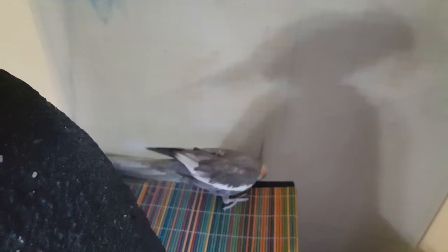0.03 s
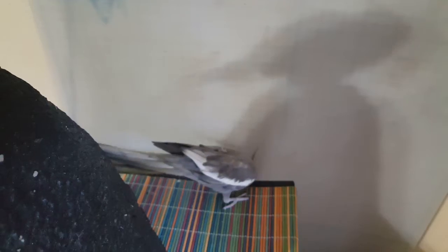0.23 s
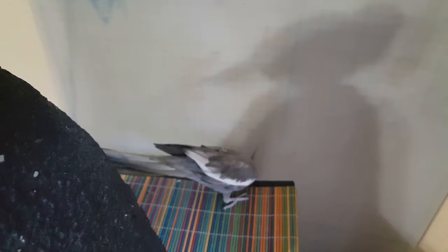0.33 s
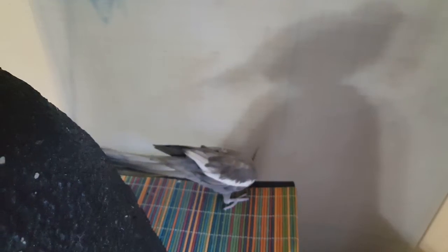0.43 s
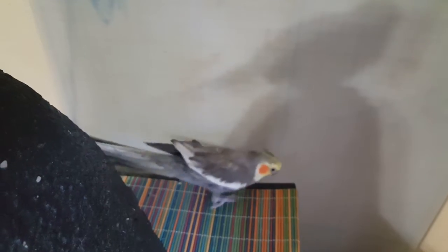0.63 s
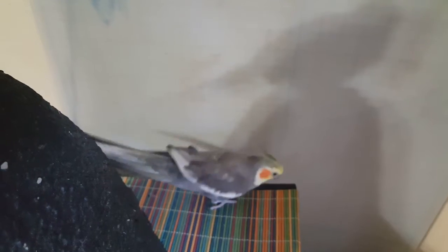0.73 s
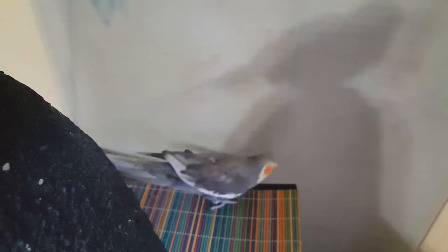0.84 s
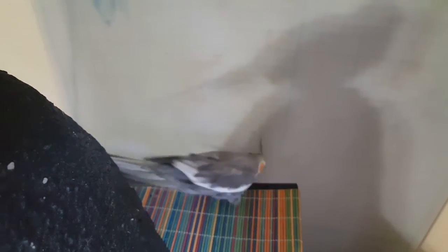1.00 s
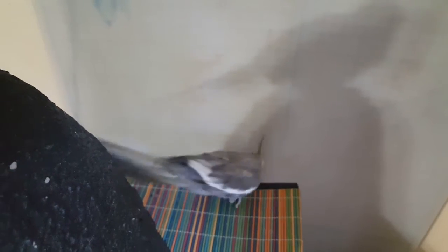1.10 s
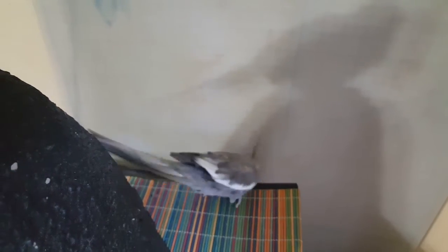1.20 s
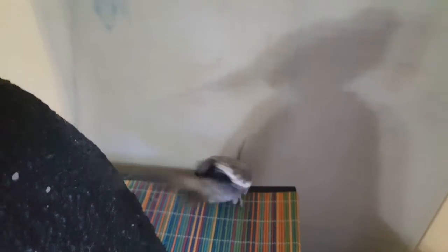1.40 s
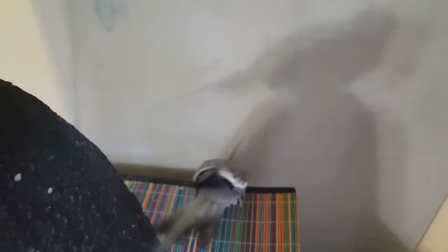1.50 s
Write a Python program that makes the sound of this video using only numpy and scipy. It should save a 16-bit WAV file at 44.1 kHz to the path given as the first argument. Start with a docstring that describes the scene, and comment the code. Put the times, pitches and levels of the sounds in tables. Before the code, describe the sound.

One brief rising and falling cockatiel chirp indoors, followed by faint footsteps.

```python
"""Cockatiel chirp and footsteps

A cockatiel gives one chirp in a small room, near the left microphone: the pitch arches up and down,
with a fast warble on the way up that breaks into a rasp as the syrinx falters, then a clean falling
whistle. Its feet tap on a woven mat and ring the board beneath, and its feathers rustle.
Under it all lie a low room rumble and a few soft bumps of the hand-held microphone."""
import sys
import numpy as np
from scipy import signal
from scipy.fft import rfft, irfft, next_fast_len
from scipy.io import wavfile
from scipy.ndimage import map_coordinates

SR = 44100
rng = np.random.default_rng(int(sys.argv[2]) if len(sys.argv) > 2 else 0)


def store_pcm(level_fs):
    """Save levels as 16-bit WAV."""
    pcm = np.round(np.clip(level_fs, -1, 1) * 32767).astype(np.int16)
    wavfile.write(sys.argv[1], SR, np.atleast_2d(pcm).T)


N = 68355
TIME = np.arange(N) / SR


def amp(db):
    """Decibels to gain."""
    return 10 ** (np.asarray(db) / 20)


def unit(x):
    """Scale to rms 1."""
    return x / np.sqrt(np.mean(x ** 2) + 1e-20)


def along(points, hz):
    """Read (frequency, value) points at hz, on a log frequency axis."""
    f, v = np.transpose(points)
    return np.interp(np.log(hz + 1), np.log(f + 1), v)


def curves(rows):
    """One automation curve for each column after the time."""
    times, *columns = np.transpose(rows)
    return [np.interp(TIME, times, column) for column in columns]


def swells(rows):
    """A rounded rise and fall for each (start, length, level) row."""
    return sum(amp(db) * np.sqrt(np.abs(np.sin(np.pi * np.clip((TIME - start) / length, 0, 1))))
               for start, length, db in rows)


def wobble(rate):
    """A smooth random curve, rate knots a second."""
    return map_coordinates(rng.standard_normal(N), [TIME * rate], mode="wrap")


def filtered(x, response):
    """Filter x by a complex response of frequency."""
    size = next_fast_len(N + SR // 2)
    return irfft(rfft(x, size) * response(np.fft.rfftfreq(size, 1 / SR)), size)[..., :N]


def eq(x, colour):
    """Shape x with a (frequency, gain) curve."""
    return filtered(x, lambda hz: amp(along(colour, hz)))


def delayed(x, ms):
    """The same sound over a longer path."""
    return filtered(x, lambda hz: np.exp(-2j * np.pi * hz * ms / 1000))


def noise(colour):
    """Coloured noise of rms 1."""
    return unit(eq(rng.standard_normal(N), colour))


# How alike the two microphones hear diffuse sound (frequency [Hz], correlation [0-1])
STEREO_LIKENESS = [(30, 1), (120, 0.89), (400, 0.69), (1200, 0.1), (4000, 0.056)]
def stereo_noise(colour):
    """Coloured noise, centred in the bass and wide in the treble."""
    def width(hz):
        return np.arccos(np.clip(along(STEREO_LIKENESS, hz), -1, 1)) / 2
    mid = filtered(noise(colour), lambda hz: np.cos(width(hz)))
    side = filtered(noise(colour), lambda hz: np.sin(width(hz)))
    return unit(np.array([mid + side, mid - side]))


# Bass-heavy room tone (frequency [Hz], gain [dB])
RUMBLE_COLOUR = [(15, -53.5), (28, -21), (45, 1), (70, 0), (125, 0), (180, -3), (350, -2.5), (520, -6),
                 (850, -13), (1900, -17.5), (2700, -20), (5500, -32), (16000, -34)]
# Its slow drift (time [s], level [dB])
RUMBLE_LEVEL = [(0, -59.5), (.22, -60), (.55, -60), (.75, -60.5), (1, -60), (1.25, -58.5), (1.55, -59)]
def room_rumble():
    """A low, nearly steady bed of room noise."""
    level_db, = curves(RUMBLE_LEVEL)
    return amp(level_db) * stereo_noise(RUMBLE_COLOUR)


# Handling bumps (start [s], length [s], level [dB])
MIC_BUMPS = [(.25, 0.084, -66), (.41, 0.23, -63.5), (.655, 0.041, -63.5)]
# Their sub-bass weight (frequency [Hz], gain [dB])
MIC_BUMP_COLOUR = [(24, -32), (40, -10.5), (50, -8), (68, -23), (110, -27), (400, -64)]
def microphone_bumps():
    """Soft low bumps of the hand-held microphone."""
    return swells(MIC_BUMPS) * noise(MIC_BUMP_COLOUR)


# Decay of the small room (frequency [Hz], t60 [s])
REVERB_DECAY = [(300, 0.12), (2000, 0.26), (5000, 0.19), (12000, 0.18)]
# Tone of the reflections (frequency [Hz], gain [dB])
REVERB_COLOUR = [(300, 14.5), (2200, -5), (5000, 2), (12000, -8)]
def room_reverb(x, predelay_s=0.0037):
    """The walls answer with a short diffuse tail, one for each microphone."""
    hz, age, spectrum = signal.stft(rng.standard_normal((2, SR // 2)), SR, nperseg=256)
    decay = amp(-60 * age / along(REVERB_DECAY, hz)[:, None])
    _, tail = signal.istft(spectrum * decay, SR, nperseg=256)
    send = np.pad(x, (int(predelay_s * SR), 0))
    wet = signal.fftconvolve(send[None], tail / np.linalg.norm(tail[0]), axes=1)[:, :N]
    return eq(wet, REVERB_COLOUR)


# Feather swishes (start [s], length [s], level [dB])
FEATHER_RUSTLES = [(.06, 0.179, -65.5), (.19, 0.04, -70), (.81, 0.016, -64), (1.092, 0.11, -67),
                   (1.198, 0.019, -57.5), (1.24, 0.036, -61.5), (1.293, 0.032, -62.5), (1.52, 0.037, -69)]
# Their broad, airy tone (frequency [Hz], gain [dB])
FEATHER_COLOUR = [(1000, 2), (3500, 1.5), (5200, 6), (7000, 0), (10000, 4), (15000, -2.5)]
def feathers(grain_db=3, pan_db=0.8):
    """Short grainy swishes as the bird turns, a touch to the left."""
    texture = unit(amp(grain_db * wobble(490)) * stereo_noise(FEATHER_COLOUR))
    return swells(FEATHER_RUSTLES) * texture * amp([[pan_db], [-pan_db]])


# Modes of the board under the mat (frequency [Hz], gain [dB], t60 [s])
BOARD_MODES = [(780, -10, .05), (980, 0, .07), (1110, -2, .06), (1400, -11, .04), (2080, -7, .05)]
def board_ring(age, scatter_db=1.5, detune=0.022):
    """The board's damped modes, a little different under every step."""
    ring = np.zeros(N)
    for hz, db, t60 in BOARD_MODES:
        envelope = amp(db + rng.normal(0, scatter_db) - 60 * age / t60)
        ring += envelope * np.sin(2 * np.pi * hz * rng.normal(1, detune) * age)
    return ring


# Foot taps (time [s], relative level [dB], scuff tilt [dB/octave], scuff t60 [s])
STEPS = [(.687, -53, 4, 0.03), (.738, -40, 1, 0.033), (.806, -49.5, 8.5, 0.034), (.826, -50, 7, 0.062),
         (.851, -52, 5, 0.039), (.892, -51, -10, 0.036), (1.036, -43.5, 8, 0.024), (1.11, -47.5, -5, 0.085),
         (1.207, -45, -2, 0.054), (1.246, -31.5, -3, 0.047), (1.257, -38.5, -18, 0.063),
         (1.269, -46, 2.5, 0.072), (1.364, -53, 0, 0.047), (1.386, -50, 7, 0.034), (1.425, -44, -9, .05),
         (1.519, -46.5, 7.5, 0.032)]
# A foot scuffing the woven mat (frequency [Hz], gain [dB])
SCUFF_COLOUR = [(200, -32), (400, -21), (620, -13), (800, -6), (1000, 0), (1400, -7), (2200, -13),
                (3100, -23), (4400, -25), (6500, -40), (15000, -46)]
def footsteps(scuff_db=-2.5, ring_db=-10, attack_s=0.0012):
    """Each step scuffs the mat and briefly rings the board under it."""
    steps = np.zeros(N)
    for start, db, tilt, t60 in STEPS:
        age = np.maximum(TIME - start, 0)
        colour = [(hz, gain + tilt * np.log2(np.clip(hz, 500, 5000) / 1000))
                  for hz, gain in SCUFF_COLOUR]
        scuff = amp(scuff_db - 60 * age / t60) * noise(colour)
        attack = 1 - np.exp(-age / attack_s)
        steps += amp(db) * attack * (scuff + amp(ring_db) * board_ring(age))
    return steps


# Resonances of throat and beak (frequency [Hz], gain [dB])
BEAK_COLOUR = [(900, -35), (1500, -1.5), (2900, -6.5), (3400, 1.5), (5000, -4), (6600, 2.5), (7600, 1.5),
               (9800, 7.5), (11600, 7.5), (13500, 5), (15500, -9)]
# Muffling added by the closed beak (frequency [Hz], gain [dB])
BEAK_MUFFLE = [(3500, 0.5), (5500, -4.5), (7000, -14), (8300, -15.5), (9300, -23), (11000, -30), (15000, 0)]
def whistle(pitch_hz, rolloff_db, closing_start_s=0.2597, closing_s=0.026, shimmer_db=1.5):
    """Ten harmonics pass through throat and beak; the closing beak dulls the upper ones."""
    closed = np.clip((TIME - closing_start_s) / closing_s, 0, 1)
    phase = 2 * np.pi * np.cumsum(pitch_hz) / SR
    tone = np.zeros(N)
    for k in range(1, 11):
        hz = np.abs(k * pitch_hz)
        db = along(BEAK_COLOUR, hz) + closed * along(BEAK_MUFFLE, hz) - rolloff_db * np.log2(k)
        db += (k > 1) * shimmer_db * wobble(251.3)
        sheen = amp(-39) / (1 + ((hz - 14400) / 500) ** 2)  # a faint, narrow peak in the top end
        tone += (amp(db) + sheen) * (hz < SR / 2) * np.sin(k * phase)
    return np.sqrt(2) * tone


# The arch of the chirp (time [s], pitch [Hz])
CHIRP_PITCH = [(.236, 1549), (.255, 1637), (.28, 1732), (.3, 1936), (.312, 2385), (.325, 2624),
               (.338, 2862), (.358, 2812), (.372, 2763), (.38, 2399), (.392, 2326), (.41, 1860),
               (.43, 1628)]
# Its envelope (time [s], relative level [dB])
CHIRP_LEVEL = [(.236, -19), (.246, -20.5), (.26, -19.5), (.269, -23.5), (.295, -22), (.325, -18),
               (.337, -25.5), (.345, -24.5), (.36, -28.5), (.376, -23), (.389, -17.5), (.403, -23),
               (.417, -26.5), (.428, -31), (.434, -51)]
# Its timbre (time [s], overtone roll-off [dB/octave], warble depth [Hz], rasp [0-1])
CHIRP_TIMBRE = [(.236, 10, 67, 0.09), (.261, 10, 93, .03), (.275, 10, 140, 0), (.298, 16.5, 258, 0.13),
                (.312, 12, 417, 0.69), (.33, 20, 220, 0.86), (.352, 14.5, 133, 0.66), (.366, 13, 90, 0.06),
                (.388, 24.5, 21, 0.07), (.41, 14.5, 30, .04), (.43, 9.5, 13, 0)]
# Tone of the rasp (frequency [Hz], gain [dB])
SYRINX_RASP_COLOUR = [(300, -35.5), (1100, -7), (1350, -16), (2000, -1.5), (3000, 4.5), (4500, -12),
                      (6200, -10), (7300, -31.5), (15000, -15)]
# Airy hiss on the voice (time [s], level [dB])
AIR_LEVEL = [(.236, -43.5), (.255, -59), (.28, -40), (.325, -46), (.345, -74), (.38, -67), (.43, -77)]
# Its bright tone (frequency [Hz], gain [dB])
AIR_COLOUR = [(600, -38.5), (1500, -24), (2700, -14), (4000, -11), (6000, -11), (7300, 4), (9000, 1),
              (12000, 9), (15000, -9), (16000, -24)]
def chirp(warble_hz=79, crest_s=0.2475, jitter=0.0035, rasp_swing_hz=633, rasp_db=-4.5, fade_s=0.0037):
    """A warbling whistle; in each trough of the warble the syrinx falters and turns rough."""
    pitch, = curves(CHIRP_PITCH)
    level_db, = curves(CHIRP_LEVEL)
    air_db, = curves(AIR_LEVEL)
    rolloff_db, depth_hz, rasp = curves(CHIRP_TIMBRE)
    warble = np.cos(2 * np.pi * warble_hz * (TIME - crest_s))
    trough = ((1 - warble) / 2) ** 2
    roughness = rasp * (0.15 + 0.85 * trough)
    hz = pitch * (1 + jitter * wobble(900)) + depth_hz * warble
    hz += rasp_swing_hz * roughness * wobble(2200)
    # The tone pulses with the warble and ducks where it turns rough.
    flutter_db = 2.3 * warble * np.clip(depth_hz / 100, 0, 1) - 9 * roughness
    voice = amp(flutter_db) * whistle(hz, rolloff_db)
    voice += amp(rasp_db) * roughness * noise(SYRINX_RASP_COLOUR)
    fade_in = np.clip((TIME - CHIRP_LEVEL[0][0]) / fade_s, 0, 1)
    fade_out = np.clip((CHIRP_LEVEL[-1][0] - TIME) / fade_s, 0, 1)
    return fade_in * fade_out * (amp(level_db) * voice + amp(air_db) * noise(AIR_COLOUR))


# Shadow on the chirp at the right microphone (frequency [Hz], gain [dB])
RIGHT_SHADOW = [(1500, -8), (2800, -4), (3600, -6.5), (5000, -5), (7000, -23), (15000, -26)]
def scene():
    """The bird in its room; chirp and steps reach the left microphone first."""
    call, steps = chirp(), footsteps()
    left = call + steps
    right = delayed(eq(call, RIGHT_SHADOW), ms=0.457) + delayed(steps, ms=0.12)
    reverb = room_reverb(amp(-12) * call) + room_reverb(amp(-11) * steps)
    background = room_rumble() + microphone_bumps()
    return background + reverb + feathers() + np.array([left, right])


def record(dry, top_hz=16000):
    """The microphone keeps nothing above its band limit."""
    return filtered(dry, lambda hz: hz < top_hz)


dry = scene()
out = record(dry)
store_pcm(out)
```